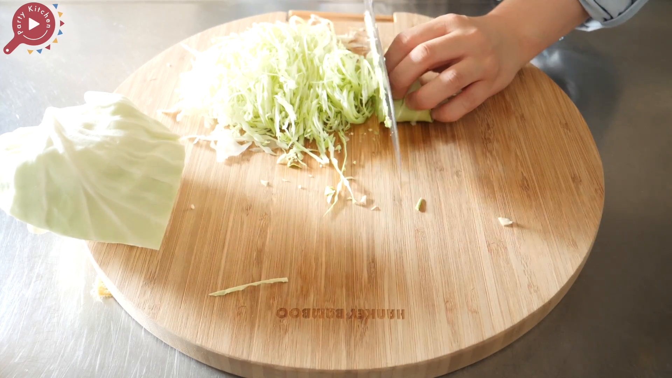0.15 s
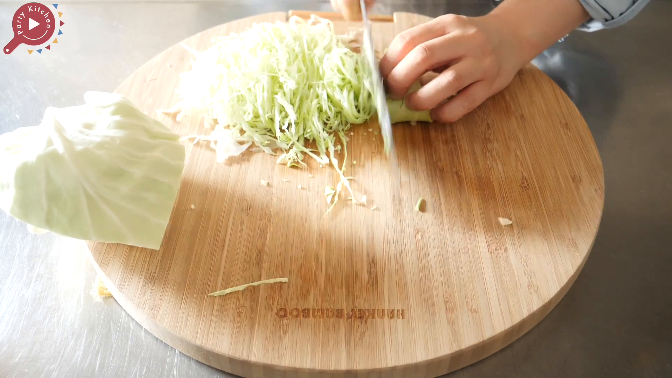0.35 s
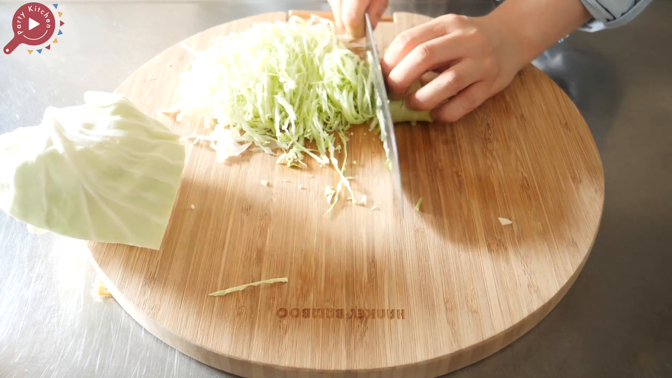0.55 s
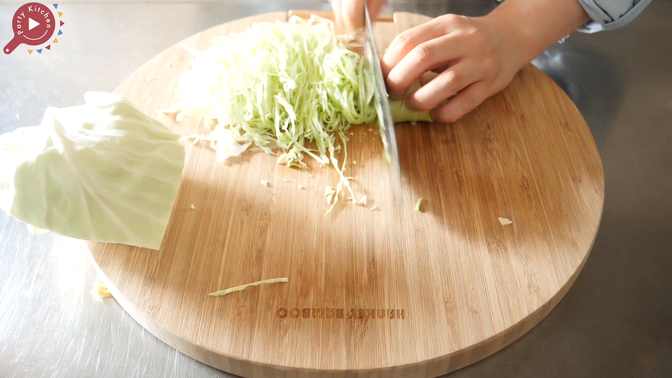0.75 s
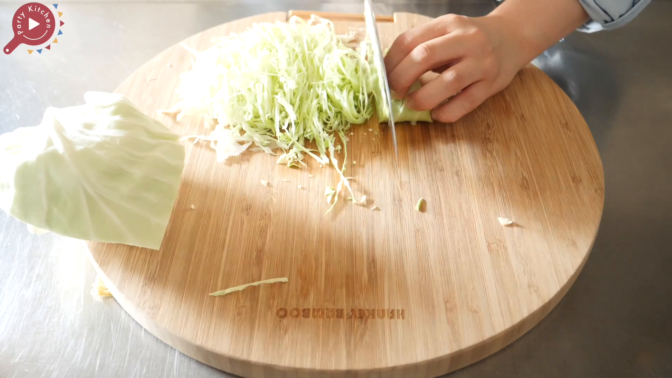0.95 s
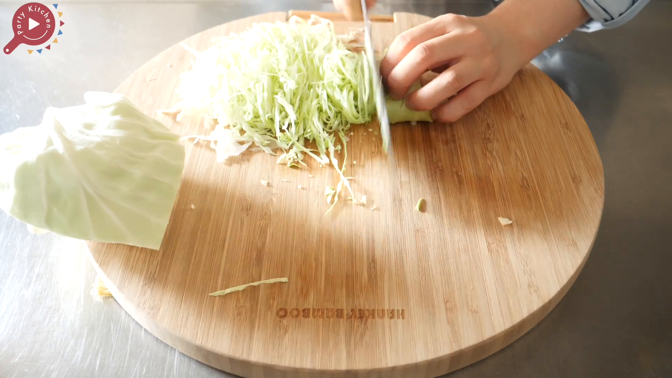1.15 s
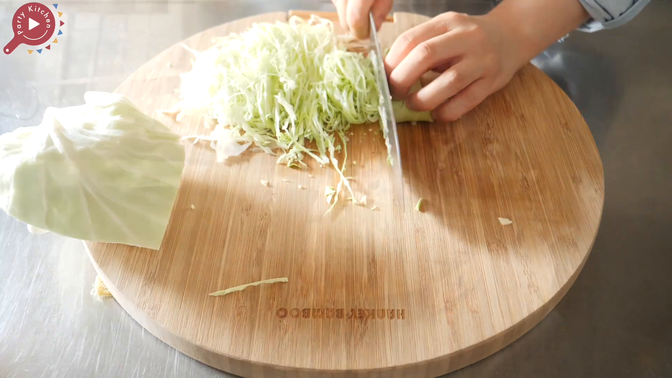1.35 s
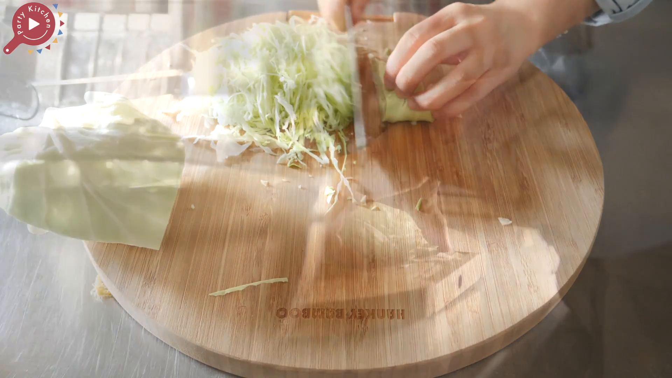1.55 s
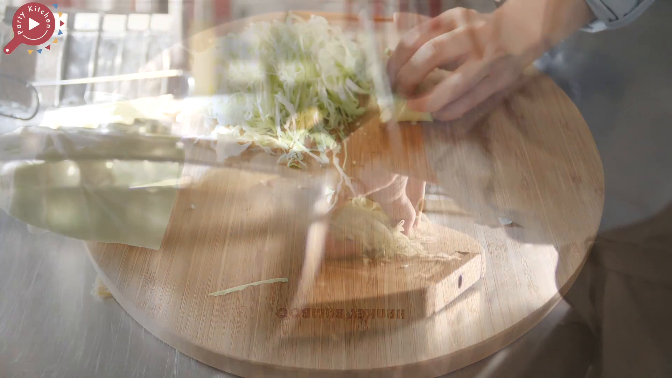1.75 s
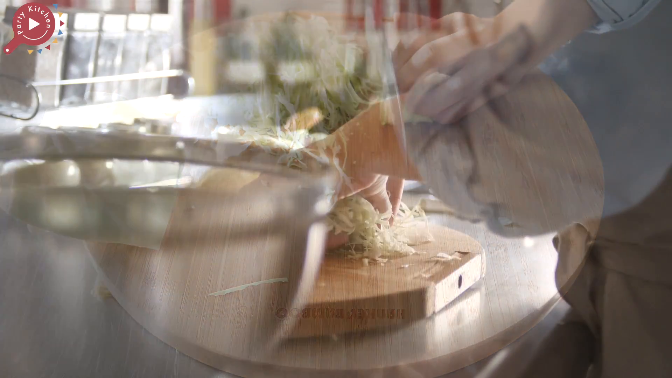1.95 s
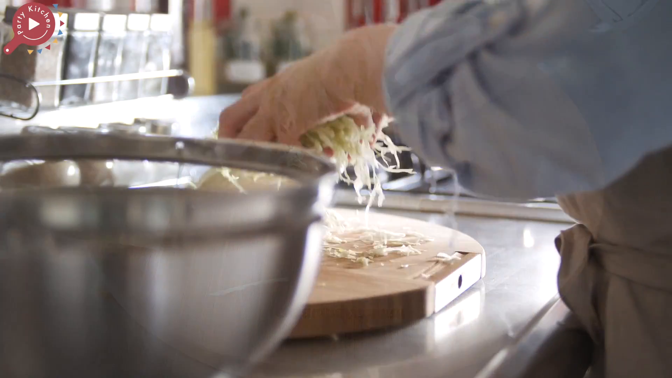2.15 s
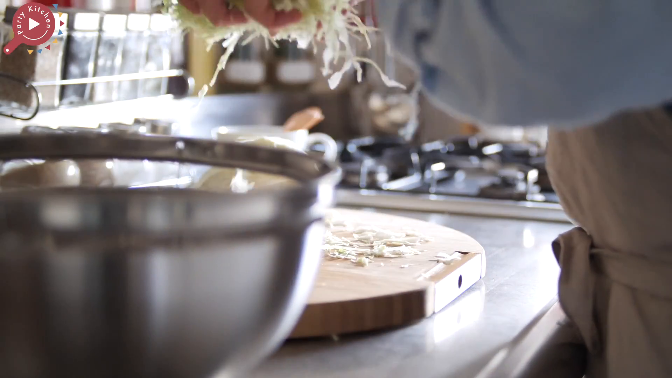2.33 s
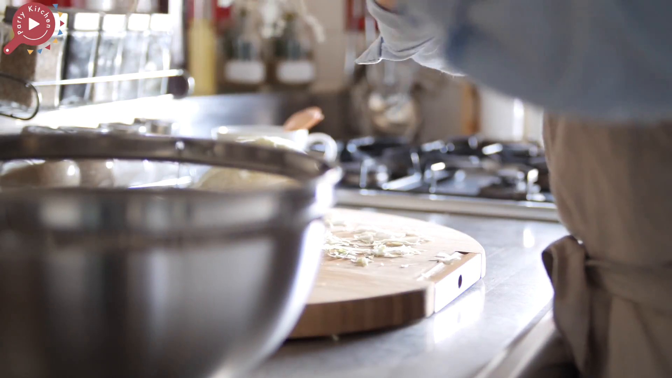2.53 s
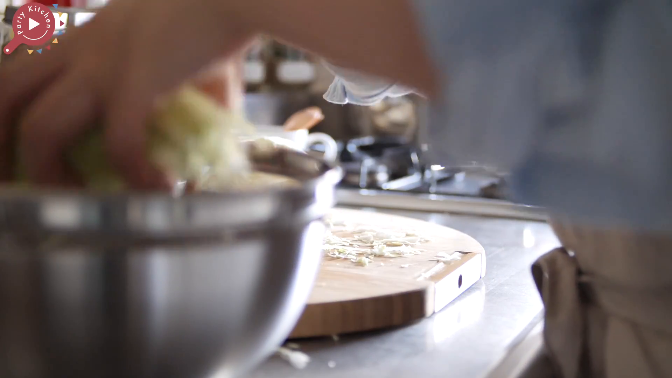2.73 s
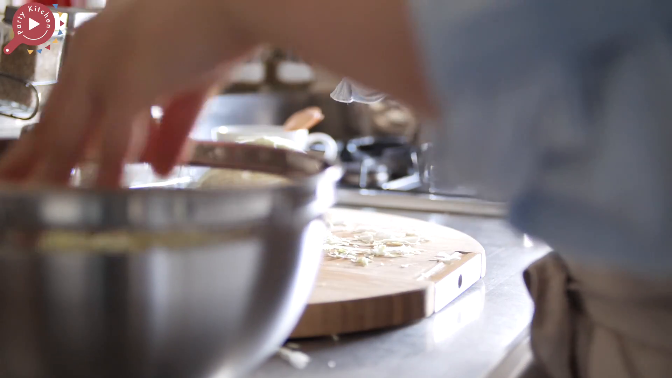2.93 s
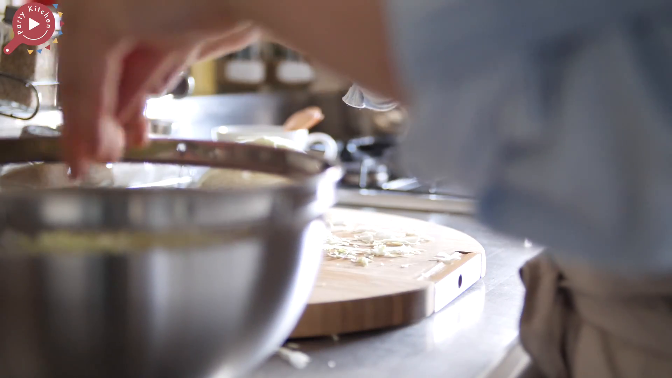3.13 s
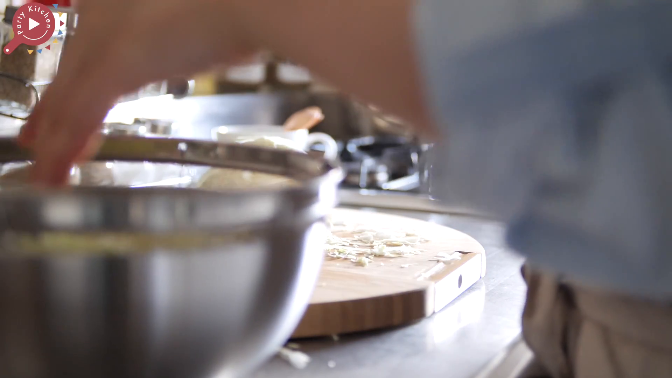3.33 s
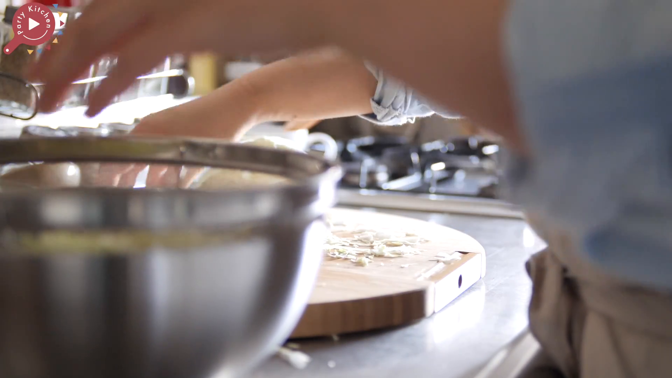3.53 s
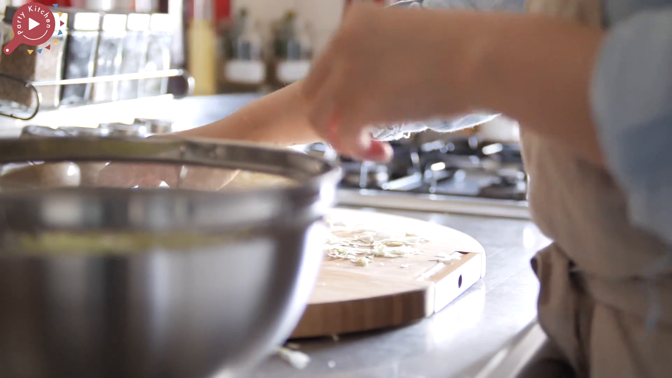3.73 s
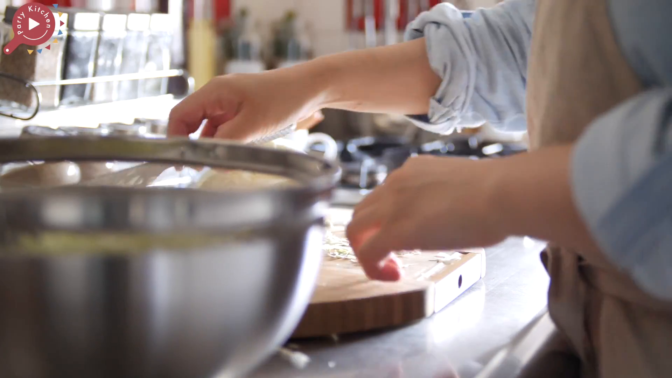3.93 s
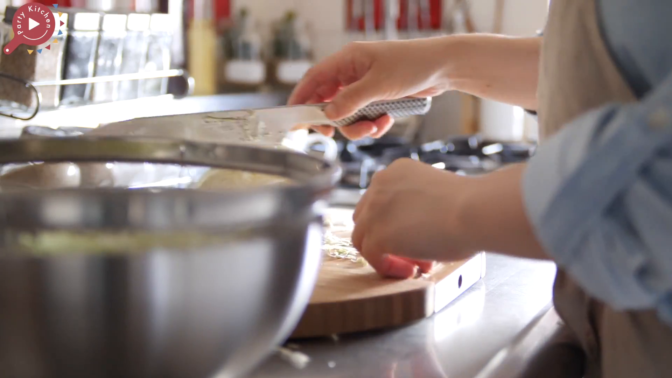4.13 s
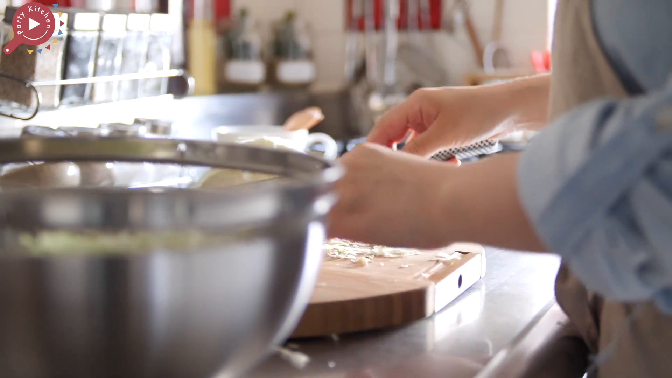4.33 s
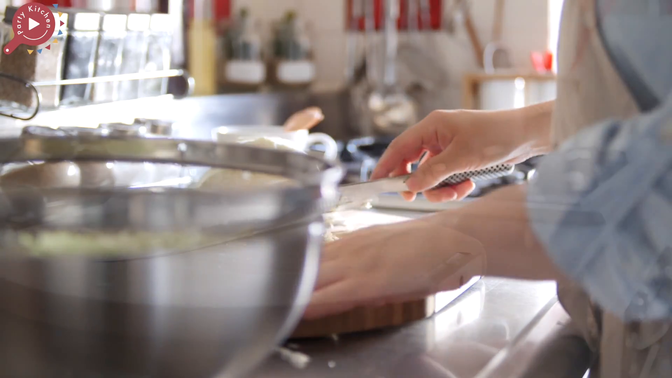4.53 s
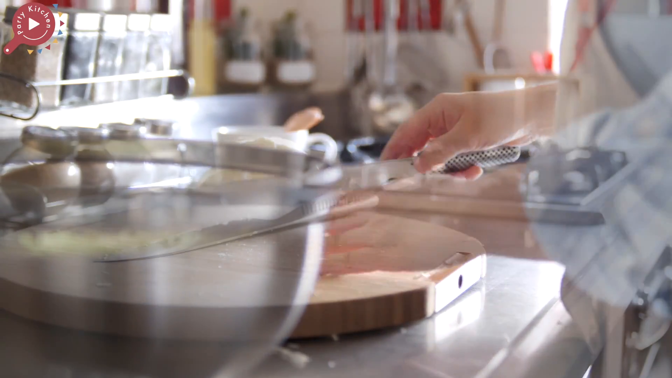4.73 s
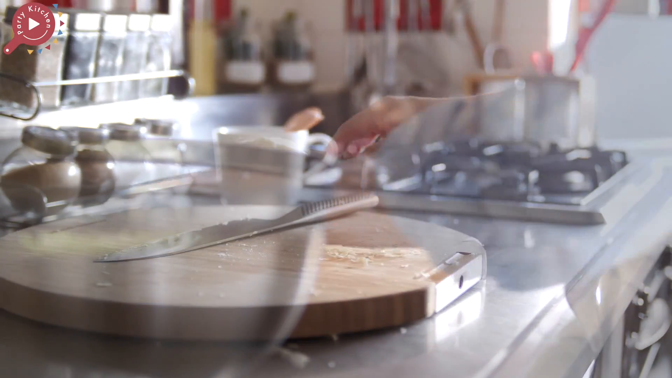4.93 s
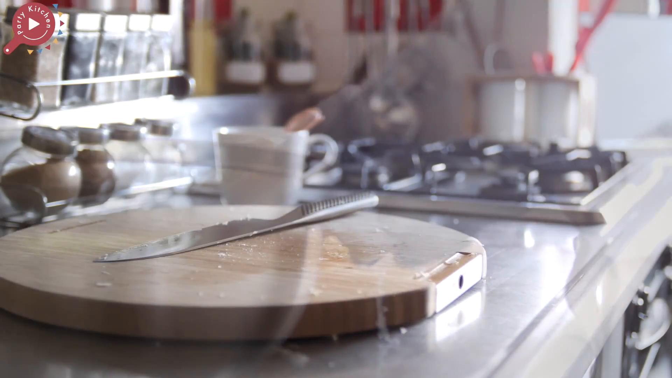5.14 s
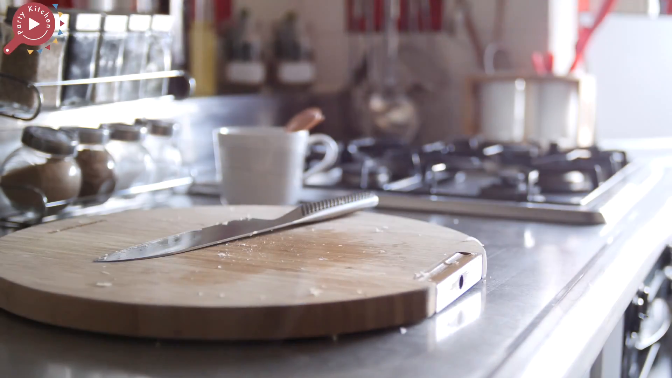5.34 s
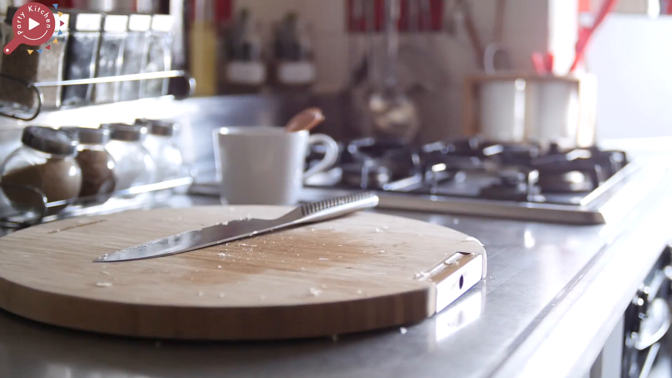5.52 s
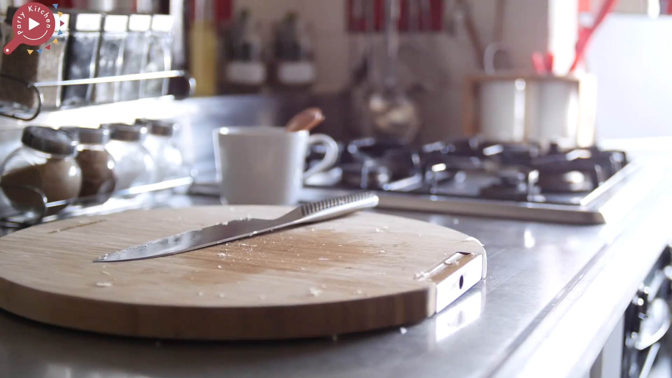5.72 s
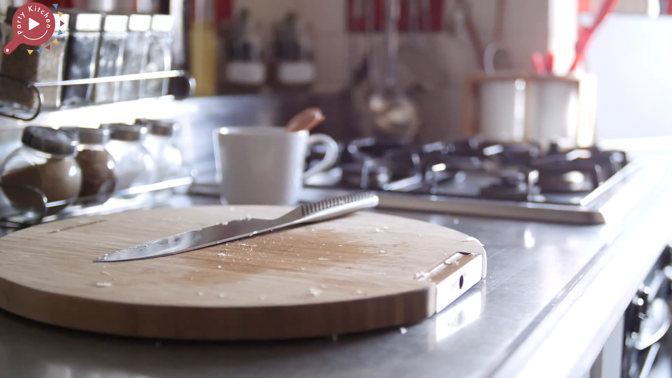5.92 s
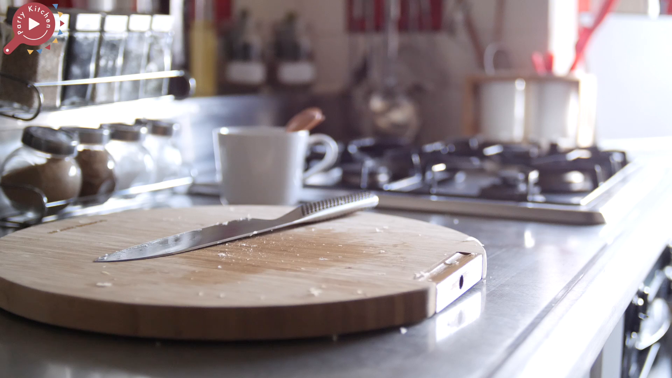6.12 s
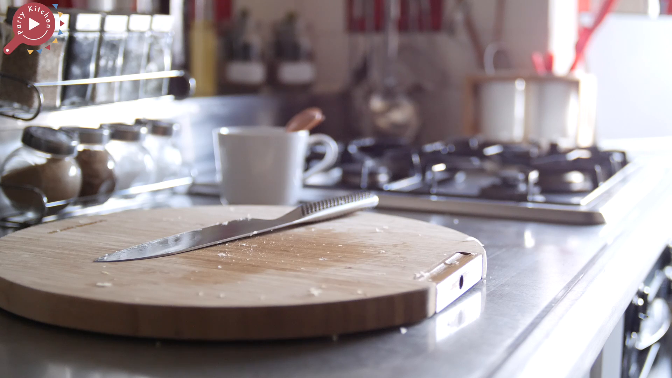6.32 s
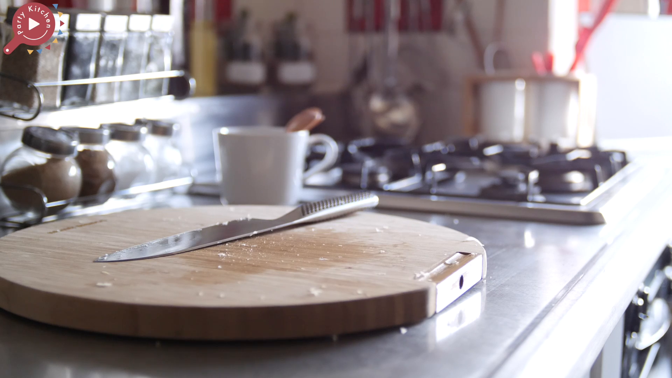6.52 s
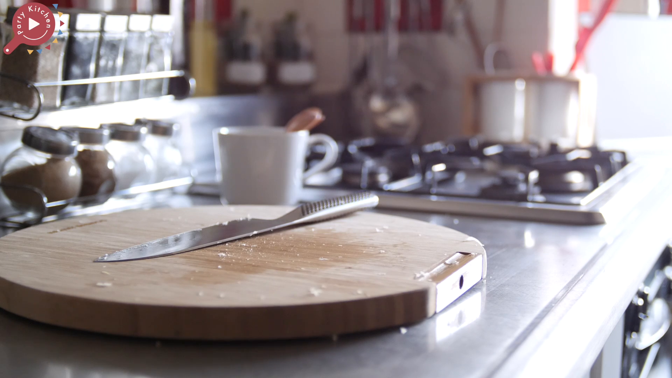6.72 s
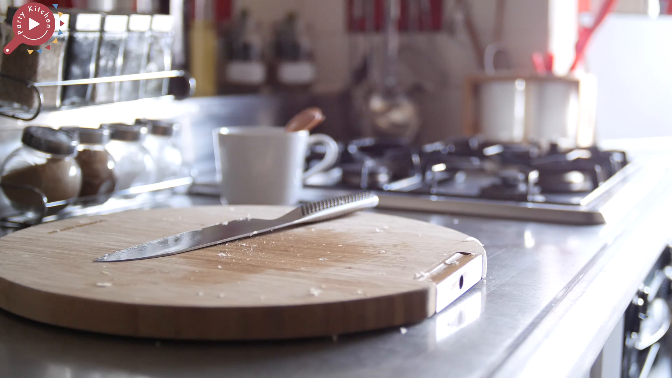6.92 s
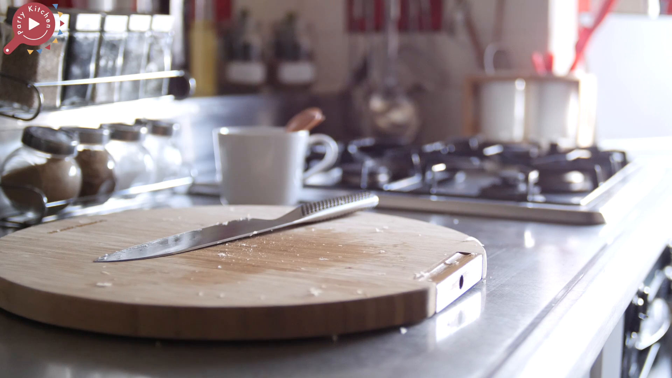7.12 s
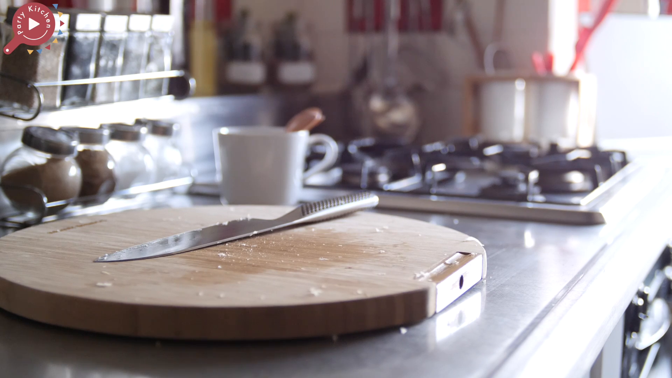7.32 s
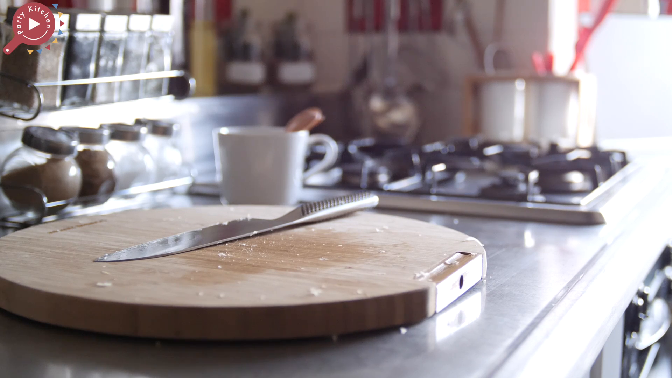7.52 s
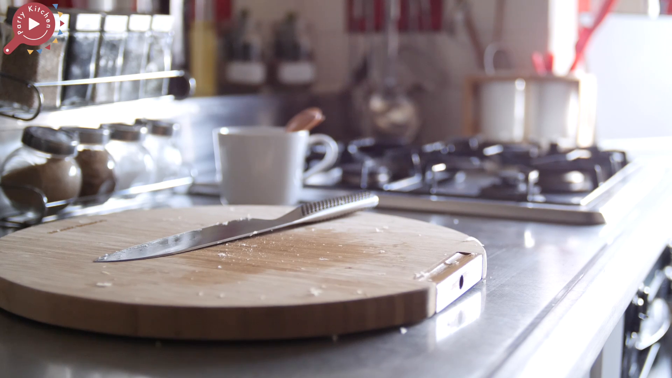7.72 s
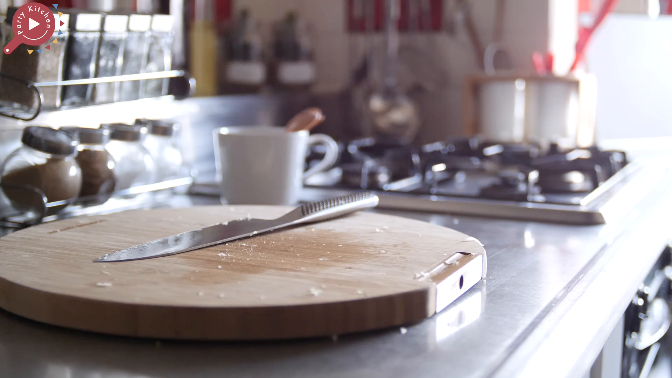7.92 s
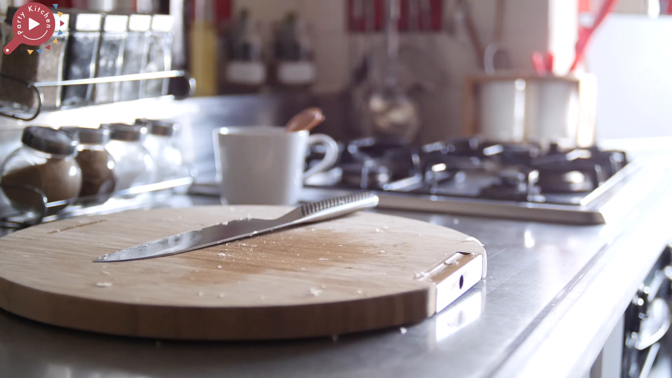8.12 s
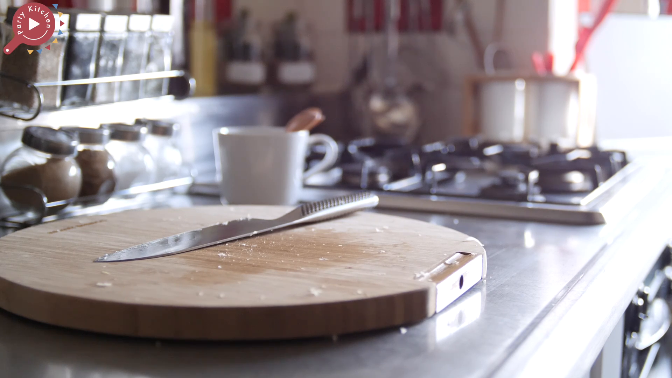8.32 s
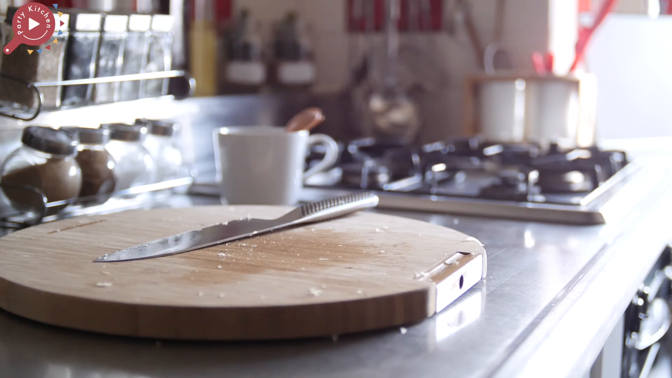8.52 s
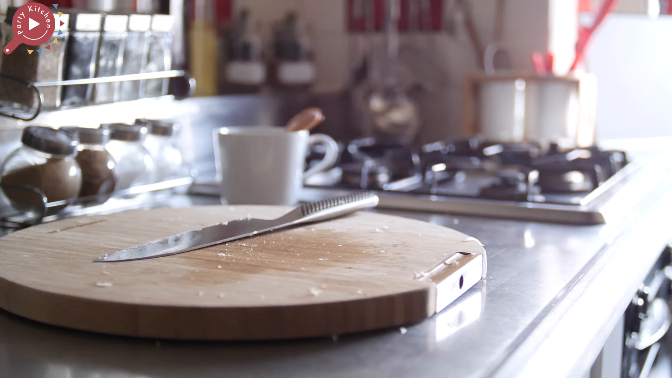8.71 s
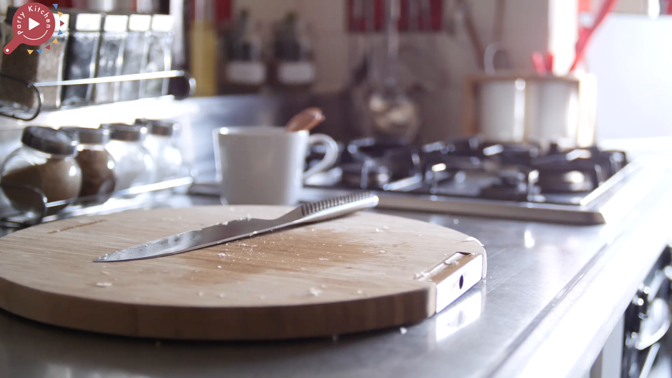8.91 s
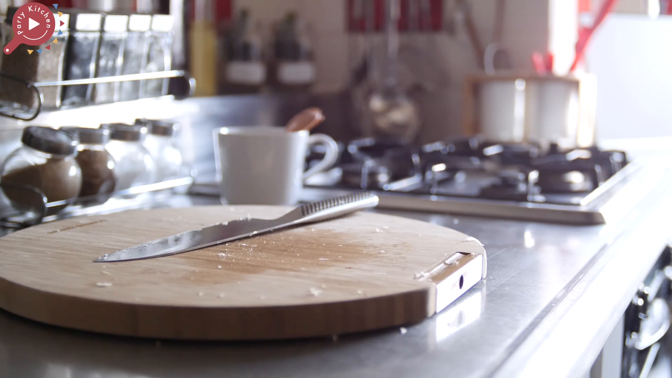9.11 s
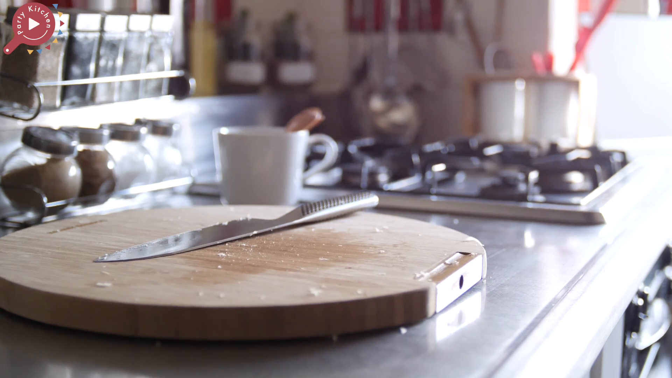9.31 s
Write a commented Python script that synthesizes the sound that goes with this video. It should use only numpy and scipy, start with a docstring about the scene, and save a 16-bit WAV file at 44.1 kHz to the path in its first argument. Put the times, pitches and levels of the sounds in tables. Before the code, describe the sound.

Six loud, crunchy knife chops through cabbage knock on a thick wooden board, then soft rustles, a laid-down knife, and water sloshing in a sink.

```python
"""Crunching knife strokes shred cabbage, each ending in a knock on a thick wooden board in a small kitchen.
Strokes are crackling noise with singing steel; knocks are decaying modes with a crack and a rattle.
Hands move the shreds to a bowl and lay the knife down; then water, shaped noise, runs and sloshes in a
sink further off. Sparse-tap echoes, room tone and mains hum lie around it; the hardest blows clip."""
import sys
import numpy as np
from scipy import signal
from scipy.fft import rfft, irfft, next_fast_len
from scipy.io import wavfile
from scipy.ndimage import uniform_filter1d

SR = 44100
rng = np.random.default_rng(int(sys.argv[2]) if len(sys.argv) > 2 else 0)


def output_pcm(signal):
    """Save a mono or channel-first signal as 16-bit PCM at the path in sys.argv[1].

    Samples are clipped to [-1, 1] before scaling.
    """
    pcm = np.clip(np.atleast_2d(signal).T, -1, 1) * 32767
    wavfile.write(sys.argv[1], SR, np.round(pcm).astype(np.int16))


N = 412776

# board modes: pitch_hz, level_db, t60_s (at ring factor 1)
BOARD_MODES = [(111.2, -9, .26), (144.1, -6, 0.15), (236.6, -10, 0.21), (330.6, -7.5, .16),
               (398.3, -10.5, 0.18), (641, -12.5, .2), (700.3, -4.5, 0.17), (752.5, -7.5, .2),
               (736.3, 0, 0.09), (791.5, -4.5, 0.11), (838, -15.5, .2), (860, -16, 0.34),
               (1071, -18.5, .14), (1100, -19, .2), (1200, -14, 0.38), (1180, -13.5, .07),
               (1265, -16, 0.22), (1257, -23, .2), (1422, -16.5, 0.27), (1710, -17, .14)]
# cabbage crunch spectrum: freq_hz, density_db_per_hz
CRUNCH_SPECTRUM = [(120, -28.5), (200, -4), (394, -5.5), (538, -16.5), (659, -3.5), (1320, -10.5),
                   (1740, -8), (3070, -9), (4350, -8), (4950, -7.5), (11900, -13.5), (16000, -25.5)]
# blade resonances: pitch_hz, width_hz, level_db
BLADE_MODES = [(4420, 130, -1), (1920, 120, -6), (6330, 120, -10), (6960, 140, -6), (11180, 200, -10),
               (12460, 200, -10.5)]
# steel basin or vessel resonance: pitch_hz, width_hz
BASIN_MODE = (308, 44)
# left-right likeness of noise and modes: freq_hz, correlation
LIKENESS = [(60, 0.92), (290, 0.86), (640, .85), (1400, 0.8), (3100, 0.12), (15000, 0.18)]
PATCH_DB = 2.4  # depth of the colour patches in spray and crunch
FADE_S = (4.55, 5.4)  # start and end of the wash's fade-in and the hum's cross-fade


def chop(wood, leaves):
    """Each stroke crunches through leaves and ends in a blow; edgier blows gain bass, treble and crack."""
    # strokes: bite_s, wood_s, bite_db, end_db, tilt_db_per_octave, ring_peak_db, edge_db
    chops = [(0.019, .084, -42.5, -35, 0.5, -6.5, -6), (0.285, .329, -46.5, -35, -1, -4, -7.5),
             (0.548, .589, -40.5, -41, 1.9, -0.5, -2), (0.803, .840, -52.5, -37, -1.5, -1, -6),
             (1.077, 1.128, -40, -36, 1, -5, -8.5), (1.361, 1.435, -40, -35, 1, -8.5, -3),
             (2.056, 2.133, -58.5, -56, 1.5, -26, -5)]
    bass_per_edge, crack_offset_db = 0.5, -5.5  # dB per dB, dB
    ring_factor, ring_per_db = 0.96, 0.0158  # weak blows ring shorter
    for bite_s, wood_s, bite_db, end_db, tilt_db, peak_db, edge_db in chops:
        add(leaves, bite_s, stroke(wood_s - bite_s, bite_db, end_db, tilt_db))
        ring = ring_factor + ring_per_db * peak_db
        hit = blow(BOARD_MODES, peak_db, bass_per_edge * edge_db, edge_db, edge_db + crack_offset_db, ring)
        add(wood, wood_s, hit)


def stroke(length_s, bite_db, end_db, tilt_db):
    """Cells burst by the thousand, unevenly, until the edge stops on the wood; the steel sings along."""
    sag_db, steel_db = -3, -11.5
    t = np.arange(round((length_s + 0.036) * SR)) / SR
    half_db = (bite_db + end_db) / 2 + sag_db
    points_s = [0, .005, length_s / 2, length_s, length_s + 0.024]
    level_db = np.interp(t, points_s, [bite_db - 10, bite_db, half_db, end_db, end_db - 25])
    fibres = patchy(noise(CRUNCH_SPECTRUM, len(t), tilt_db, grain_db=2.1), PATCH_DB, 1.3)
    steel = gain_of(steel_db) * singing(BLADE_MODES, len(t), grain_db=4.5)
    return gain_of(level_db) * (fibres + steel)


def blow(modes, peak_db, bass_db, treble_db, crack_db, ring_factor):
    """The modes ring, each a little differently at the two ears, over a short crack and a dense rattle."""
    # edge meeting wood: freq_hz, density_db_per_hz
    crack_spectrum = [(180, -50), (300, -0.5), (762, -5), (1250, -9), (2610, -25.5), (3190, -48),
                      (4440, -25), (5430, -41.5), (16000, -59.5)]
    # dense upper modes: freq_hz, density_db_per_hz
    rattle_spectrum = [(150, -29.5), (350, -14), (520, -22.5), (750, -1), (1300, -3), (1600, -15.5),
                       (2600, -19), (3300, -26), (9000, -45)]
    t = np.arange(SR // 4) / SR
    hz, mode_db, t60_s = np.transpose(modes)[:, :, None]
    tone_db = read([(250, bass_db), (750, 0.01), (1200, treble_db)], hz)
    mode_db = mode_db + tone_db + 1.7 * rng.standard_normal(hz.shape)
    hz = hz * (1 + 0.0027 * rng.standard_normal(hz.shape))  # each mode's pitch varies slightly from blow to blow
    likeness = np.clip(read(LIKENESS, hz), -1, 1)
    phase_rad = .6 * np.arccos(likeness) * rng.choice([-.5, .5], hz.shape)
    fall_db = -60 * t / ring_factor
    decay = gain_of(mode_db + fall_db / t60_s)
    ears = [(decay * np.sin(2 * np.pi * hz * t + ear * phase_rad)).sum(0) for ear in (1, -1)]
    ring = np.array(ears)
    ring *= np.minimum(t / 0.0012, 1) / abs(ring).max()
    crack = gain_of(crack_db - 60 * t / .03) * noise(crack_spectrum, len(t))
    late_return = gain_of(-30 - 8.7 * ((t - .135) / 0.014) ** 2) * ring_factor ** 4
    swell = (gain_of(fall_db / 0.31) + late_return) * np.minimum(t / 0.0092, 1)
    rattle = gain_of(-17 + treble_db) * swell * noise(rattle_spectrum, len(t))
    fade_out = np.minimum((t[-1] - t) / 0.058, 1)
    return gain_of(peak_db) * (ring + crack + rattle) * fade_out


def sweep(leaves):
    """The blade sweeps shreds aside: swelling bursts of crunch noise."""
    # sweeps: start_s, level_db, rise_s, t60_s, tilt_db_per_octave
    sweeps = [(1.572, -49, .006, .25, -1.5), (1.6, -41.5, .045, .2, -3)]
    for start_s, *settings in sweeps:
        add(leaves, start_s, burst(CRUNCH_SPECTRUM, *settings, flicker_db=2.0))


def tick_ribs(leaves):
    """The edge ticks on single ribs."""
    # ticks: start_s, level_db (before a common trim), tilt_db_per_octave
    ticks = [(0.2532, -34.5, 1), (0.465, -40, -1.5), (0.4966, -38, -1), (0.524, -39, 0),
             (0.7283, -37.5, -4), (0.7766, -44, -1), (1.0133, -41, -1.5), (1.275, -43, -3.5),
             (1.3007, -43, 0), (1.3484, -46, 2), (1.5863, -35, 8), (1.96, -50, 3), (2.049, -46, 1.5),
             (2.09, -51, 2), (2.354, -53, -5), (2.677, -55, -4), (3.99, -58, 2.5), (4.066, -51, -5),
             (4.7137, -41, 6)]
    for start_s, *settings in ticks:
        add(leaves, start_s, tick(*settings))


def tick(level_db, tilt_db):
    """A snap of a few ms with a short ring of the blade's first resonance."""
    t = np.arange(800) / SR
    snap = gain_of(-60 * t / .012) * noise(CRUNCH_SPECTRUM, len(t), tilt_db)
    ring = gain_of(-13.5 - 60 * t / .03) * singing(BLADE_MODES[:1], len(t))
    return gain_of(level_db - 4.0) * (snap + ring)


def rustle(leaves):
    """Shreds dropped or brushed aside: noise bursts, the first a faint stir under the chopping."""
    # rustles: start_s, level_db, rise_s, t60_s, tilt_db_per_octave
    rustles = [(0, -52, 0.28, 9, -6), (2.802, -42.5, 0.003, 0.15, 0.5), (2.892, -44, 0.011, .22, -1.5),
               (3.72, -71.5, 0.052, 0.51, -3.5), (4.1, -76.5, 0.16, 0.4, 1.5)]
    # loose shreds: freq_hz, density_db_per_hz
    shred_spectrum = [(200, -20.5), (350, -10), (750, -6.5), (1400, -13), (3000, -23.5), (7600, -7),
                      (11500, -7.5), (16000, -21.5)]
    for start_s, *settings in rustles:
        add(leaves, start_s, burst(shred_spectrum, *settings))


def knock_board(wood):
    """Hands knock the board's modes; more treble brings more crack and a shorter ring."""
    # knocks: start_s, ring_peak_db, bass_db, treble_db
    knocks = [(2.554, -52, -1, 9), (2.688, -55.5, -4, 12), (2.81, -46, -3, -5), (2.905, -48, 5, -9),
              (2.994, -47, 7.5, -1)]
    for start_s, peak_db, bass_db, treble_db in knocks:
        crack_db = -13 + 1.2 * treble_db
        ring = max(0.7 - .03 * treble_db, .2)
        add(wood, start_s, blow(BOARD_MODES, peak_db, bass_db, treble_db, crack_db, ring))


def lay_knife(wood):
    """The knife is laid down and rocks on the board: blows on the modes of the two together."""
    # contacts: start_s, ring_peak_db, ring_factor
    contacts = [(3.852, -30, 0.71), (3.919, -36, 0.9), (3.991, -51.5, 0.82), (4.065, -49.5, 0.52)]
    # modes: pitch_hz, level_db, t60_s (at ring factor 1)
    knife_modes = [(107, -2.5, 0.27), (232.4, -1.5, 0.21), (325, -5.5, 0.21), (640, -0.5, 0.065),
                   (1100, -3, 0.15), (1204, -5.5, 0.11), (1770, -12.5, 0.071), (2280, -19, 0.05)]
    for start_s, peak_db, ring in contacts:
        add(wood, start_s, blow(knife_modes, peak_db, bass_db=0.5, treble_db=-0.5, crack_db=-12.5,
                                ring_factor=ring))


def run_water(sink):
    """Spray, mist and coarser splashing follow the flow; the low wash and humming basin fade in and hold."""
    # flow: time_s, spray_level_db, splash_re_spray_db
    flow = [(4.5, -98, 2), (4.66, -70, 0.5), (5.22, -58.5, -13), (5.3, -65, -10), (5.46, -55, -3),
            (5.93, -59.5, -16), (5.97, -60, -1.5), (6.14, -54, -4.5), (7.03, -50, -0.5), (7.15, -47.5, 1),
            (7.29, -50, -10), (7.34, -53.5, -4), (7.63, -55, -11), (7.75, -51.5, 7), (7.95, -54.5, -4.5),
            (8.42, -56.5, -14), (8.64, -66, -0.5), (8.71, -58.5, -15), (8.86, -57, -2.5), (9.36, -56, -2)]
    # spectra: freq_hz, density_db_per_hz
    spray_spectrum = [(2400, -30), (3400, -18.5), (5200, -17), (6800, -20), (9000, -44)]
    mist_spectrum = [(5500, -28), (7200, -5), (9000, -3.5), (14500, -8.5), (16000, -19)]
    splash_spectrum = [(1000, -50), (1600, -4), (2400, -1.5), (3200, -4.5), (4500, -24)]
    wash_spectrum = [(150, -0.5), (350, -2), (650, -6), (1000, -11.5), (1400, -9), (2400, -43)]
    # the basin rings under the wash: pitch_hz, width_hz, level_db
    basin_ring = [(674.6, 10, -13), (1009.6, 13, -14), (1307, 32, -13.5)]
    mist_db, mist_per_coarse = -2.5, -0.24  # dB, dB per dB: coarser splashing, less mist
    wash_db, basin_db = -60, -67.5
    time_s, level_db, coarse_db = np.transpose(flow)
    t = np.arange(time_s[0], N / SR, 1 / SR)
    level_db, coarse_db = np.interp(t, time_s, level_db), np.interp(t, time_s, coarse_db)
    mist_gain = gain_of(mist_db + mist_per_coarse * coarse_db)
    mist = mist_gain * patchy(noise(mist_spectrum, len(t), grain_db=1.6), 1.5, 1.6)
    spray = patchy(noise(spray_spectrum, len(t), grain_db=0.8), PATCH_DB, 1.7)
    splash = gain_of(coarse_db) * patchy(noise(splash_spectrum, len(t), grain_db=-0.9), 3.9, 1.3)
    wash = noise(wash_spectrum, len(t), grain_db=1.5) + singing(basin_ring, len(t))
    basin = noise(bump(*BASIN_MODE), len(t))
    steady = gain_of(wash_db) * wash + gain_of(basin_db) * basin
    add(sink, time_s[0], gain_of(level_db) * (mist + spray + splash) + np.interp(t, FADE_S, [0, 1]) * steady)


def slosh(sink):
    """Water thrown against the basin: noise bursts, dull sloshes and bright surges."""
    # sloshes: start_s, level_db, rise_s, t60_s, tilt_db_per_octave
    sloshes = [(5.402, -43, .0024, 0.16, 15.5), (5.78, -45, .03, 0.31, 12.5), (6.256, -43, .003, 0.2, 11.5),
               (6.92, -49.5, 0.042, 0.91, -1), (7.066, -32.5, 0.0032, 0.33, 1),
               (7.122, -31, 0.017, 0.41, -0.5), (7.631, -44.5, 0.0031, 0.36, 6.5),
               (7.709, -24, .008, 0.34, 0.55), (7.85, -36, .014, 0.41, 0.5), (8.693, -59, .003, 0.22, 21),
               (9.165, -45.5, .003, 0.32, 9.5)]
    # slosh: freq_hz, density_db_per_hz
    slosh_spectrum = [(80, -33), (200, -12.5), (420, -6.5), (650, -0.5), (1250, -4), (2200, -10),
                      (6000, -22.5), (16000, -45.5)]
    for start_s, *settings in sloshes:
        add(sink, start_s, burst(slosh_spectrum, *settings, flicker_db=1.45))


def plop_drops(drops):
    """Single splats of water."""
    # splats: start_s, level_db, pitch_hz
    plops = [(5.0586, -53, 2010), (5.4038, -43.5, 2770), (5.97, -47, 1800), (6.2584, -35, 2280),
             (6.327, -41, 5500), (6.4183, -48, 5430), (6.6515, -34, 2850), (7.2769, -40, 5560),
             (7.3982, -42.5, 1600), (8.1194, -46, 2350), (8.594, -47, 5170), (8.9536, -44.5, 2700),
             (9.011, -44, 1970), (9.1663, -40, 2280), (9.295, -48, 1740)]
    for start_s, *settings in plops:
        add(drops, start_s, plop(*settings))


def plop(level_db, hz):
    """A cluster of bubbles of nearly one size bursts and dies away."""
    t60_s, rise_s = .07, 0.004
    t = np.arange(SR // 5) / SR
    shape = gain_of(level_db - 60 * t / t60_s) * np.minimum(t / rise_s, 1)
    return shape * noise(bump(hz, 0.18 * hz), len(t), grain_db=1.5)


def boom_vessel(sink):
    """A hollow steel vessel booms softly at its resonance, as shreds or water land in it."""
    # booms: start_s, level_db
    booms = [(2.9, -57), (2.985, -56), (5.12, -52.5), (5.44, -52), (6.5, -60), (6.661, -58), (6.891, -55),
             (7.11, -49.5), (7.38, -49.5), (7.64, -48), (7.71, -44), (7.85, -43.5), (8.039, -53.5),
             (8.1, -49), (8.569, -51.5)]
    for start_s, level_db in booms:
        add(sink, start_s, burst(bump(*BASIN_MODE), level_db, rise_s=.035, t60_s=.3, tilt_db=0))


def thud_counter(sink):
    """The counter thuds at one low resonance when leaned on and under the heaviest sloshes."""
    # thuds: start_s, level_db
    thuds = [(3.675, -53), (7.07, -54), (7.71, -50), (7.85, -44.5)]
    # counter: pitch_hz, width_hz, rise_s, t60_s
    counter = (105, 25, .012, 0.23)
    hz, width_hz, rise_s, t60_s = counter
    for start_s, level_db in thuds:
        add(sink, start_s, burst(bump(hz, width_hz), level_db, rise_s, t60_s, tilt_db=0))


def kitchen(x):
    """Sparse taps of random sign, each band dying at its own speed, other taps for each ear."""
    # reverberation: freq_hz, t60_s
    decay_times = [(100, 0.71), (700, 0.39), (2000, 0.27), (5000, 0.28), (12000, 0.25)]
    taps = np.zeros((2, SR // 2))
    slots = np.arange(200, SR // 2 - 20, 20)
    at = slots + rng.integers(0, 20, (2, len(slots)))
    np.put_along_axis(taps, at, rng.choice([-1., 1.], (2, len(slots))), 1)
    hz, t, z = signal.stft(taps, SR, nperseg=256)
    decay = gain_of(-60 * t / read(decay_times, hz)[:, None])
    tail = signal.istft(z * decay, SR, nperseg=256)[1]
    return signal.oaconvolve(x, tail / np.linalg.norm(tail[0]), axes=1)[:, :N]


def room_tone():
    """Steady coloured noise with faint narrow whines."""
    # air: freq_hz, density_db_per_hz
    air_spectrum = [(15, -9), (30, 1), (80, -2.5), (125, 4.5), (200, -3.5), (310, -3.5), (500, -10),
                    (800, -17.5), (2000, -25.5), (4500, -31.5), (6000, -30.5), (8000, -35.5),
                    (10500, -32.5), (16000, -44)]
    # whines: pitch_hz, width_hz, level_db
    whines = [(1870, 23, -90.5), (2470, 28, -92.5), (6140, 34, -93), (10340, 170, -95)]
    air_db = -64
    return gain_of(air_db) * noise(air_spectrum, N) + singing(whines, N)


def hum():
    """Two stretches of mains hum, nearly half a cycle out of step, cancel where they cross-fade."""
    # flat-topped mains wave: multiple, level_db_rms
    harmonics = [(1, -48), (3, -63.5), (5, -79)]
    mains_hz, slip_cycles = 50, .43
    t = np.arange(N) / SR
    later = np.interp(t, FADE_S, [0, 1])

    def wave(slip):
        cycles = mains_hz * t + slip
        return sum(gain_of(db) * np.sqrt(2) * np.sin(2 * np.pi * k * cycles) for k, db in harmonics)

    return (1 - later) * wave(0) + later * wave(slip_cycles)


def burst(spectrum, level_db, rise_s, t60_s, tilt_db, flicker_db=1.5):
    """A lumpy burst of noise swells quickly and dies away, cut off after 1.7 s at most."""
    t = np.arange(round(min(rise_s + t60_s, 1.7) * SR)) / SR
    shape = np.minimum(t / rise_s, 1) * gain_of(-60 * np.maximum(t - rise_s, 0) / t60_s)
    lumpy = patchy(noise(spectrum, len(t), tilt_db, grain_db=0.05), 1.5, flicker_db)
    return gain_of(level_db) * shape * lumpy


def singing(modes, size, grain_db=0.):
    """Noise ringing in a set of narrow resonances."""
    hz, width_hz, db = np.transpose(modes)[:, :, None]
    grid_hz = np.geomspace(100, 16000, num=2000)
    power = (gain_of(db) ** 2 / width_hz / (1 + (2 * (grid_hz - hz) / width_hz) ** 4)).sum(0)
    spectrum = np.transpose([grid_hz, 10 * np.log10(power)])
    return np.linalg.norm(gain_of(db)) * noise(spectrum, size, grain_db=grain_db)


def bump(hz, width_hz):
    """Spectrum of one resonance."""
    far = 4 * width_hz
    return [(max(hz - far, 20), -60), (hz - width_hz, -12), (hz, 0), (hz + width_hz, -12), (hz + far, -60)]


def noise(spectrum, size, tilt_db=0., grain_db=0.):
    """Two-channel coloured noise of rms 1; grain_db makes it crackle, tilt_db turns it about 3 kHz."""
    n = next_fast_len(size)
    hz = np.fft.rfftfreq(n, 1 / SR)
    grains = np.minimum(rng.exponential(1, n // 32 + 1), 5)
    lumps = np.repeat(gain_of(grain_db * grains), 32)[:n]  # under 1 ms each
    a, b = rfft(rng.standard_normal((2, n)) * lumps)
    same = np.clip(read(LIKENESS, hz), -1, 1)
    z = np.array([a, same * a + np.sqrt(1 - same ** 2) * b])
    colour_db = read(spectrum, hz) + tilt_db * np.log2((hz + 200) / 3000)
    return evened(irfft(z * gain_of(colour_db), n)[:, :size])


def patchy(x, patch_db, flicker_db):
    """Drifting patches of colour, and brief flickers shared by wide bands."""
    hz, t, z = signal.stft(x, SR, nperseg=256)
    a, b = rng.standard_normal((2, len(t), len(hz))).transpose(0, 2, 1)
    patches = evened(uniform_filter1d(uniform_filter1d(a, size=5, axis=0), size=16, axis=1))
    flicker = evened(uniform_filter1d(uniform_filter1d(b, size=40, axis=0), size=3, axis=1))
    varied = z * gain_of(patch_db * patches + flicker_db * flicker)
    return evened(signal.istft(varied, SR, nperseg=256)[1][:, :x.shape[1]])


def from_right(x, lag_samples):
    """The left ear hears it late."""
    return np.array([np.roll(x[0], lag_samples), x[1]])


def gain_of(db):
    """Amplitude factor of a level in dB."""
    return 10 ** (np.asarray(db) / 20)


def evened(x):
    """Scale to rms 1."""
    return x / np.sqrt(np.mean(x ** 2) + 1e-20)


def read(points, hz):
    """Interpolate a table over log frequency."""
    f, value = np.transpose(points)
    return np.interp(np.log(hz + 1), np.log(f + 1), value)


def add(mix, start_s, sound):
    """Mix a sound in at its start time, cut at the end of the mix."""
    part = mix[:, round(start_s * SR):][:, :sound.shape[1]]
    part += sound[:, :part.shape[1]]


def scene():
    """Board and leaves near, sink further off, with echoes, room tone and hum."""
    wood, leaves, sink, drops = np.zeros((4, 2, N))
    chop(wood, leaves)
    sweep(leaves)
    tick_ribs(leaves)
    rustle(leaves)
    knock_board(wood)
    lay_knife(wood)
    run_water(sink)
    slosh(sink)
    plop_drops(drops)
    boom_vessel(sink)
    thud_counter(sink)
    echoes = kitchen(gain_of(-16.5) * wood + gain_of(-8.0) * leaves + gain_of(1.0) * drops)
    near = from_right(wood + leaves, lag_samples=2)
    far = from_right(sink + drops, lag_samples=7)
    return near + far + echoes + room_tone() + hum()


def record(dry):
    """A hard knee clips the loudest blows; then the band limit."""
    ceiling, edge_hz = .35, 15900
    clipped = dry / (1 + abs(dry / ceiling) ** 8) ** (1 / 8)
    lowpass = signal.firwin(511, edge_hz, window=("kaiser", 9), fs=SR)
    return signal.oaconvolve(clipped, lowpass[None], "same")


dry = scene()
out = record(dry)
output_pcm(out)
```